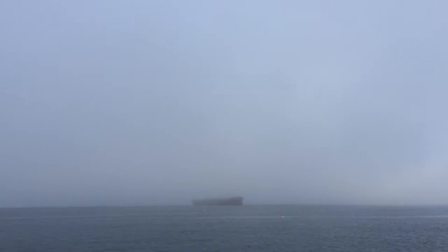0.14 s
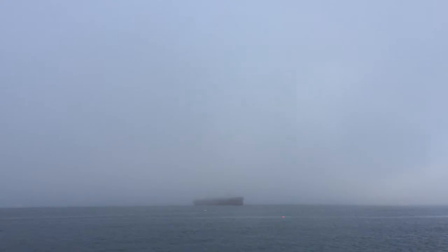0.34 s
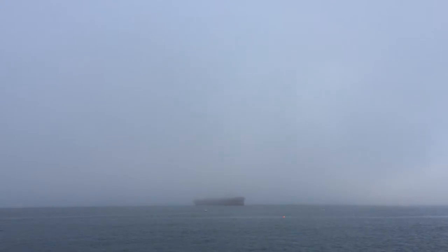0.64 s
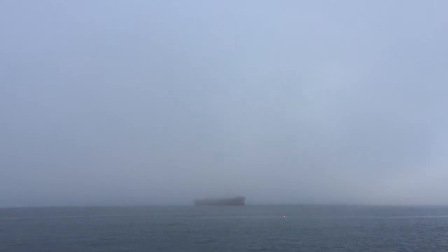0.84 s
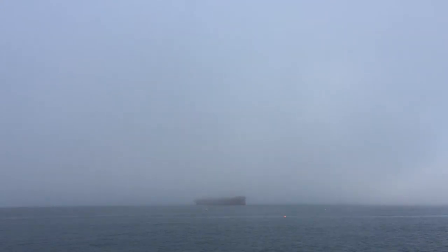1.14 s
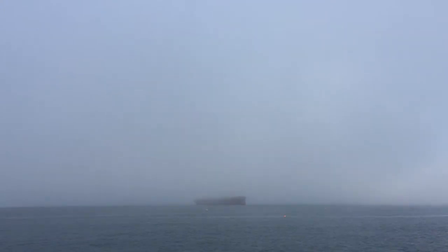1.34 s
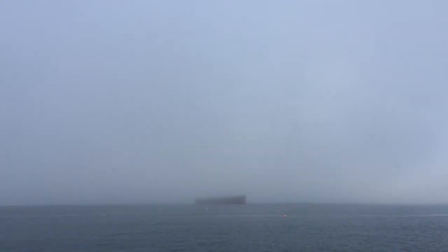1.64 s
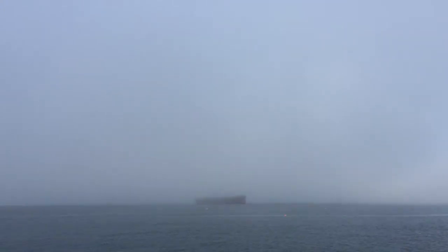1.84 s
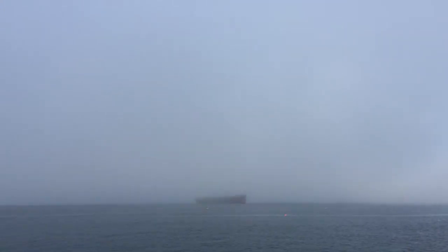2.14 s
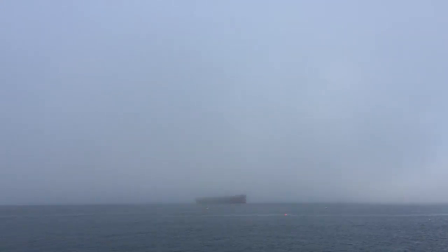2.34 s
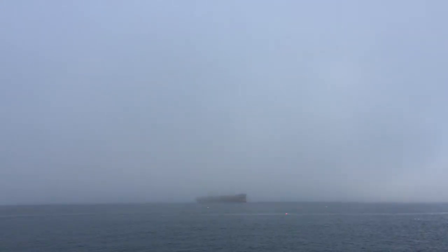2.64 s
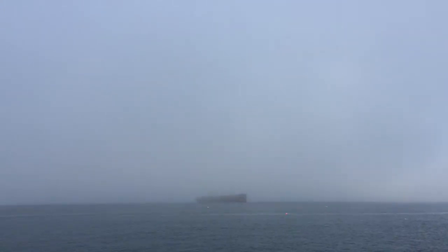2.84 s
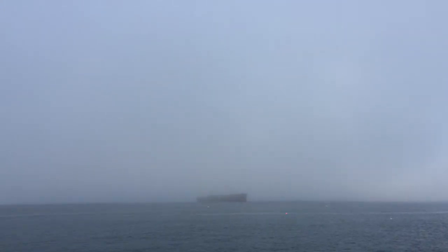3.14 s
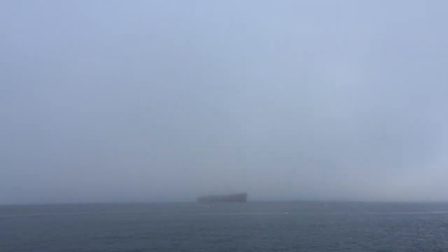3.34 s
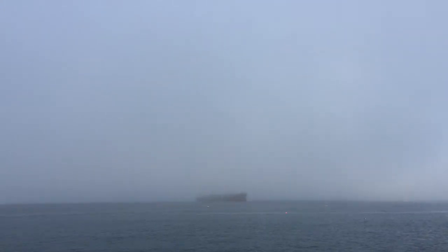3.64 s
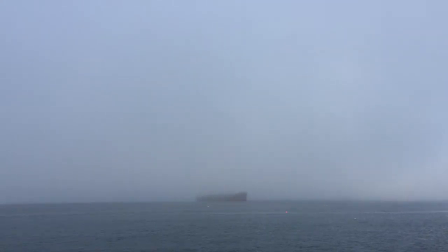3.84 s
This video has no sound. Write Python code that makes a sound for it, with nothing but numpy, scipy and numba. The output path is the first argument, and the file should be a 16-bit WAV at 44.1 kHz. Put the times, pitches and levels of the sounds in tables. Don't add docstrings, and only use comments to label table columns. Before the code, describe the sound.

A distant ship's low, reedy horn enters late over gusty wind buffeting and faint sea wash.

```python
import sys
import numpy as np
from scipy import signal
from scipy.fft import rfft, irfft
from scipy.io import wavfile
from scipy.ndimage import uniform_filter1d
from numba import njit

SR = 44100
rng = np.random.default_rng(int(sys.argv[2]) if len(sys.argv) > 2 else 0)


def master_out(mix):
    frames = np.transpose(np.atleast_2d(mix))
    ceiling = np.clip(frames, -1, 1)
    pcm = np.round(ceiling * 32767).astype(np.int16)
    wavfile.write(sys.argv[1], SR, pcm)


def gain_from_decibels(decibels):
    exponent = np.asarray(decibels, float) / 20
    return 10 ** exponent


N = 176400

# (multiple of the pitch [-], level [dB])
STRAIGHT_TONES = [(1, -0.5), (2, -10), (3, 3.5), (4, 0), (5, -2.5), (6, -0.5), (7, -6.5), (8, -6.5),
                  (9, -13), (10, -18), (11, -29.5), (12, -31), (13, -25), (14, -40), (15, -33.5), (16, -38),
                  (17, -33)]
# (multiple of the pitch [-], level [dB])
BENT_TONES = [(1, 5), (2, -7), (3, -16), (4, -2), (5, -10), (6, -33), (7, -6), (8, -15), (9, -14.5),
              (10, -12), (11, -13), (12, -20), (13, -34), (14, -28.5), (15, -42), (16, -49), (17, -37)]
# (time [s], pitch [Hz], dip centre [Hz], dip depth [dB])
HORN_PATH = [
    (3.15, 165.5, 1800, -9),
    (3.19, 161.8, 1780, -7),
    (3.24, 161.3, 1750, 16),
    (3.36, 160.4, 1710, -18),
    (3.475, 162.1, 1140, 22),
    (3.52, 161.8, 1460, 8),
    (3.63, 162.2, 1380, 17),
    (3.8, 163, 1370, 7.5),
    (4, 163, 1300, -7),
]
# (time [s], dip centre [Hz], dip depth [dB])
FOG_BANKS = [
    (3.15, 820, -4.5),
    (3.28, 800, 1),
    (3.36, 960, 5),
    (3.43, 1350, 2),
    (3.48, 820, 5),
    (3.54, 650, -4.5),
    (3.68, 700, -2),
    (3.8, 960, 5),
    (4, 990, 3),
]
# (time [s], rumble level [dB])
GUSTS = [(0.0, -39), (0.05, -45.5), (0.61, -42), (0.8, -33.5), (0.95, -45.5), (1.25, -37), (1.29, -43),
         (1.63, -38), (1.77, -40.5), (1.98, -36), (2.3, -39.5), (2.51, -32), (2.99, -32), (3.125, -33),
         (3.15, -29), (3.7, -31), (3.79, -31), (4.0, -37)]
# (centre time [s], peak level [dB], swing rate [Hz], swings [-])
SLOW_PUFFS = [(.318, -37, 98, 1.3), (.70, -30, 77.4, 2), (.79, -30, 144.7, 3.4), (.85, -30, 110, 0.89),
              (1.004, -31.5, 89.4, 0.85), (1.2, -28.5, 89, 2.2), (1.245, -32, 116, 1.5),
              (1.354, -30, 99, 0.48), (1.604, -30, 119, 1.4), (1.905, -22, 82, 1.2), (1.99, -21.5, 99, 2.2),
              (2.031, -22.5, 96, 2.3), (2.072, -22, 93.5, 1.05), (2.196, -24.5, 114, 1),
              (2.337, -23, 81, 1.44), (2.41, -24.5, 110.6, 3.4), (2.462, -18.5, 155, 1.53),
              (2.49, -27, 150, 1.6), (2.517, -28, 92, 1.8), (2.545, -25, 130, 1.6),
              (2.565, -23.5, 101, 1.9), (2.59, -23, 153, 1.1), (2.637, -17.5, 204, 3.7),
              (2.74, -25, 94, 1.5), (2.803, -14.5, 73.4, 0.77), (2.864, -24, 89, 2.4),
              (2.948, -21, 111, 1.98), (3.145, -15.5, 134, 1.05), (3.209, -12, 172, 0.54),
              (3.265, -25, 110, 1.6), (3.306, -20, 122, 1.1), (3.35, -30, 118, 2.66),
              (3.556, -18.5, 112, 1.5), (3.613, -21.5, 101, 2.57), (3.749, -17, 150, 0.76),
              (3.758, -21, 150, 0.92), (3.773, -12.5, 154.8, 1.16), (3.803, -14.5, 190, 0.64),
              (3.812, -30, 162, 0.46), (3.841, -21, 112, 0.78), (3.857, -19.5, 119, 0.8)]
# (centre time [s], peak level [dB], swing rate [Hz], swings [-])
QUICK_FLICKS = [(.748, -32.5, 330, 0.67), (1.191, -47, 400, 0.88), (1.732, -39, 400, 1.2),
                (2.056, -34, 400, 0.78), (2.187, -26.5, 513, 1.9), (2.196, -32, 740, 2.2),
                (2.205, -27, 530, 2.13), (2.44, -38, 400, 1.4), (2.538, -26.5, 476, 1.4),
                (2.584, -32, 523, 2.6), (2.633, -21.5, 330, 0.77), (2.643, -19.5, 574, 2.16),
                (2.642, -22, 1110, 0.49), (2.653, -23.5, 330, 3.8), (2.729, -32.5, 400, 1),
                (2.808, -23, 440, 1.06), (2.827, -29, 443, 1.6), (2.862, -33, 450, 1.5),
                (2.881, -29, 514, 1.6), (2.977, -22, 450, 1.3), (2.99, -25, 380, 1.4),
                (2.997, -14, 282, 1.88), (3.003, -8, 420, 0.98), (3.084, -38, 430, 1.4),
                (3.147, -17, 396, 0.62), (3.261, -19, 408, 6.2), (3.321, -17.5, 380, 5.6),
                (3.452, -25, 450, 4.6), (3.48, -22, 500, 3), (3.5, -34, 550, 2), (3.534, -21, 423, 2.21),
                (3.651, -20.5, 500, 3.77), (3.705, -22, 560, 1.36), (3.717, -19, 560, 2),
                (3.736, -16, 348, 1), (3.742, -15.5, 626, 1.6), (3.751, -14.5, 503, 0.76),
                (3.763, -19, 493, 1.9), (3.798, -22, 580, 1.4), (3.803, -16, 330, 1.2),
                (3.807, -14.5, 497, 1.31), (3.815, -17.5, 390, 1.17), (3.825, -22, 516, 1.44),
                (3.835, -14, 460, 2.02), (3.963, -24.5, 470, 0.86)]
# (time [s], level [dB], tilt [dB per octave])
WAVES = [(0, -65.5, -3), (.27, -56.5, -1.7), (.55, -56.5, -1), (1.84, -59, -1.25), (1.88, -53.5, 0.5),
         (2.08, -54, -1), (2.24, -49.5, 0.5), (2.28, -56.5, -2.4), (2.53, -60.5, -2), (2.61, -52.5, 2.5),
         (2.68, -54.5, 1.5), (2.85, -51, -0.6), (3.36, -57.5, -3.5), (3.4, -63, -3), (3.66, -62.5, 0.5),
         (3.72, -51.5, 2), (3.83, -57.5, -1), (4, -53, -0.5)]
# (frequency [Hz], density [dB per Hz])
FOAM_COLOUR = [
    (120, -31),
    (200, -6.5),
    (407, -6),
    (534, -9),
    (1680, -9),
    (3120, -18),
    (7480, -21.5),
    (13400, -30),
    (15500, -27),
]
# (time [s], peak level [dB], pitch [Hz], ring length [cycles])
CLOSE_BUBBLES = [(.173, -49, 7600, 8), (.2, -47, 1530, 12), (.24, -43, 1390, 8), (0.252, -43.5, 7800, 5.4),
                 (0.661, -42.5, 2500, 6), (.705, -44, 10000, 3), (.755, -50, 6000, 3),
                 (1.236, -43, 1550, 8), (1.68, -60, 4000, 4), (2.204, -40, 12000, 1.2),
                 (2.239, -38.5, 1500, 7.8), (2.565, -50, 2750, 20), (2.6, -33.5, 7000, 3.4),
                 (2.921, -41.5, 1850, 12), (2.954, -41, 1400, 15), (3.115, -52, 4100, 17),
                 (3.14, -49, 4000, 15)]


def set_level(x, db):
    return x * gain_from_decibels(db) / np.sqrt(np.mean(x ** 2))


def curve(table, col):
    rows = np.array(table)
    return np.interp(np.arange(N) / SR, rows[:, 0], rows[:, col])


def walk(rate):
    hold = int(SR / rate)
    steps = np.repeat(rng.standard_normal(N // hold + 1), hold)
    smooth = uniform_filter1d(uniform_filter1d(steps, hold), hold)[:N]
    return smooth / smooth.std()


@njit
def moving_filter(x, hz, damp):
    low, band = np.empty(len(x)), np.empty(len(x))
    band_state, low_state = 0., 0.
    for i in range(len(x)):
        g = np.tan(np.pi * hz[i] / SR)
        v = (band_state + g * (x[i] - low_state)) / (1 + g * (g + damp))
        low[i], band[i] = low_state + g * v, damp * v
        band_state, low_state = 2 * v - band_state, low_state + 2 * g * v
    return low, band


def horn_path(tones, wavers, turns, cut_db, start_rad):
    tone = 0
    for (multiple, db), (waver_db, waver_rad) in zip(tones, wavers):
        strength = gain_from_decibels(db + waver_db - cut_db[multiple])
        tone = tone + strength * np.sin(multiple * turns + start_rad + waver_rad)
    return tone


def horn():
    on = int(3.149 * SR)
    since = np.arange(N - on) / SR
    hz, dip_hz, dip_db = (curve(HORN_PATH, col)[on:] for col in range(1, 4))
    bank_hz, bank_db = (curve(FOG_BANKS, col)[on:] for col in range(1, 3))
    turns = 2 * np.pi * np.cumsum(hz) / SR
    dip_width_hz, shimmer_db, shimmer_rad = 74, 0.29, 0.019
    wavers, cut_db = [], {}
    for k, _ in STRAIGHT_TONES:
        wavers.append((np.sqrt(8 * k) * shimmer_db * walk(9)[on:], k * shimmer_rad * walk(9)[on:]))
        bank_cut = bank_db * np.exp(-((k * hz - bank_hz) / dip_width_hz) ** 2 / 2)
        bounce_cut = dip_db * np.exp(-((k * hz - dip_hz) / dip_width_hz) ** 2 / 2)
        cut_db[k] = bank_cut + bounce_cut
    # (tones, lag [s], rise [s], level [dB], drift [dB per s], start phase [rad])
    paths = ((STRAIGHT_TONES, 0, 0.012, -26.5, -12, -0.38), (BENT_TONES, 0.12, 0.4, -36, 3.5, -2.03))
    out = np.zeros(N)
    for tones, lag, rise, db, drift_db, start_rad in paths:
        tone = set_level(horn_path(tones, wavers, turns, cut_db, start_rad), db)
        fade_in = np.clip((since - lag) / rise, 0, 1)
        out[on:] += tone * fade_in * gain_from_decibels(drift_db * np.maximum(since - lag, 0))
    return out


def rumble():
    gust = curve(GUSTS, 1)
    octaves = 0.0537 * (gust + 40) + 0.24 * walk(20)
    hz = np.clip(130 * 2 ** octaves, 30, 900)
    low = rng.standard_normal(N)
    for stage in (1.1, 1.5, 2.2):
        low = moving_filter(low, stage * hz, 1.74)[0]
    low = low - moving_filter(low, np.full(N, 45.), 4.3)[0]
    even = low / np.sqrt(uniform_filter1d(low ** 2, size=SR // 8))
    flutter_db = 2 * walk(22.1)
    return set_level(even * gain_from_decibels(flutter_db), -0.29) * gain_from_decibels(gust)


def eddies(table, ragged):
    swirl_oct, snap = 0.54, 0.34
    out = np.zeros(N + SR)
    wander = np.clip(walk(150), -1.5, 1.5)
    noise = rng.standard_normal(N + SR)
    for s, db, hz, swings in table:
        half, i = int(max(swings, .3) / hz * SR), int(s * SR)
        u = np.arange(-half, half) / half
        bell = np.cos(np.pi * u / 2) ** 2
        pace = hz * 2 ** (swirl_oct * wander[i] * u + 0.3 * (bell - 1))
        phase = 2 * np.pi * np.cumsum(pace) / SR
        phase = phase - phase[half] + 4.19 + .5 * wander[i]
        torn = moving_filter(noise[i:i + 2 * half], 1.28 * pace, 1.02)[0]
        torn = moving_filter(torn, 1.55 * pace, 1.28)[0]
        torn = moving_filter(torn, 0.87 * pace, 2.15)[1] * bell
        mix = np.clip(ragged * (swings - 1), 0, 1)
        smooth = bell * np.sin(phase - snap * np.sin(phase))
        swing = (1 - mix) * smooth + mix * torn / np.abs(torn).max()
        out[i - half:i + half] += gain_from_decibels(db) * swing
    return moving_filter(out[:N], np.full(N, 1230.), 1.4)[0]


def puffs():
    return eddies(SLOW_PUFFS, 0.13)


def flicks():
    return eddies(QUICK_FLICKS, 0.76)


def crackle():
    per_s = 70
    when, size, pitch, swings = rng.random((int(per_s * 4), 4)).T
    when = .05 + 3.9 * when
    gust = curve(GUSTS, 1)[(when * SR).astype(int)]
    db = -46.5 + 1.77 * (gust + 35) + 12 * (size - .5)
    hz = 330 * 2 ** (1.2 * (pitch - .5))
    return eddies(np.array([when, db, hz, 1.07 + 2.2 * swings]).T, 0.76)


def wash():
    colour = np.array(FOAM_COLOUR)
    tilt, spray = curve(WAVES, 2), walk(22)
    out, shared = 0, walk(11.0)
    for hz in 200 * 2 ** np.arange(0, 6.5, 1 / 3):
        shared = 0.81 * shared + 0.78 * walk(8.73)
        db = np.interp(np.log(hz), np.log(colour[:, 0]), colour[:, 1])
        db = db + tilt * np.log2(hz / 5000)
        db = db + 1.2 * shared + 1.78 * walk(25.14) + 1.04 * spray
        centre = np.full(N, hz)
        band = moving_filter(rng.standard_normal(N), centre, 0.51)[1]
        out = out + gain_from_decibels(db) * moving_filter(band, centre, 0.51)[1]
    return set_level(out, 7.28) * gain_from_decibels(curve(WAVES, 1))


def drops():
    per_s = 300
    out = np.zeros(N + SR)
    swell = gain_from_decibels(curve(WAVES, 1) + 63.5)
    for when, pitch, size, ring in rng.random((int(per_s * 4), 4)):
        hz, i, cycles = 900 * 2 ** (3.9 * pitch), int(when * N), 1 + 3.55 * ring
        u = np.arange(int(4 * cycles * SR / hz)) * hz / SR
        ping = np.sin(2 * np.pi * u * (1 + .01 * u)) * np.exp(-u / cycles * 0.72)
        size_db = min(-3 * np.log(size + 1e-9), 7)
        db = -60 + size_db - 2.5 * abs(np.log2(hz / 3000))
        out[i:i + len(u)] += swell[i] * gain_from_decibels(db) * ping
    return out[:N]


def pops():
    out = np.zeros(N + SR)
    for s, db, hz, cycles in CLOSE_BUBBLES:
        i = int(s * SR)
        u = np.arange(int(4 * cycles * SR / hz)) * hz / SR
        ring = np.sin(2 * np.pi * u * (1 + 0.00194 * u)) * np.exp(-u / cycles)
        out[i:i + len(u)] += gain_from_decibels(db) * ring * np.minimum(u, 1)
    return out[:N]


def scene():
    wind = rumble() + puffs() + flicks() + crackle()
    water = wash() + drops() + pops()
    return (horn() + wind + water)[None]


def low_pass(x):
    return signal.sosfilt(signal.butter(12, 15940, fs=SR, output="sos"), x)


def record(dry):
    bass_cut = signal.butter(3, 53.6, "high", fs=SR, output="sos")
    heard = signal.sosfilt(bass_cut, dry)
    heard = heard + gain_from_decibels(-73) * rng.standard_normal(dry.shape)
    hz = np.arange(N // 2 + 1) * SR / N
    mix = irfft(rfft(heard) * (hz < 15300), N)
    return low_pass(mix)


dry = scene()
out = record(dry)
master_out(out)
```